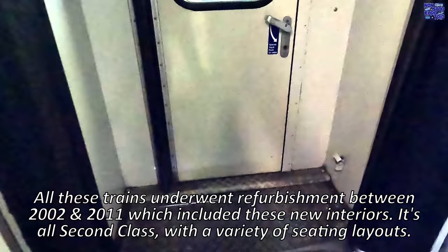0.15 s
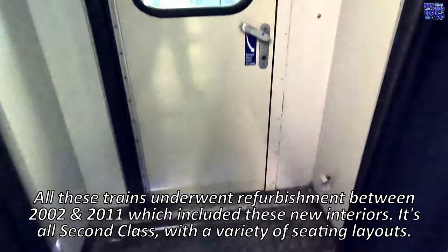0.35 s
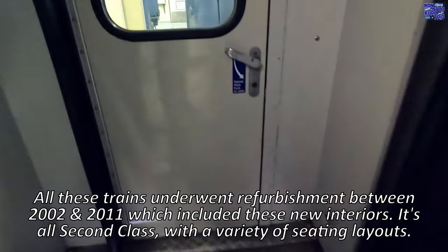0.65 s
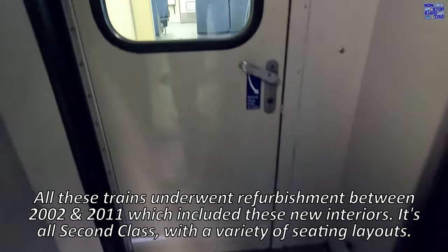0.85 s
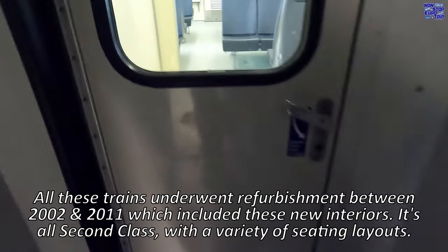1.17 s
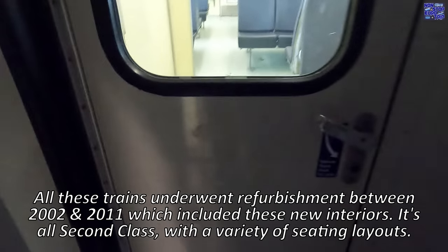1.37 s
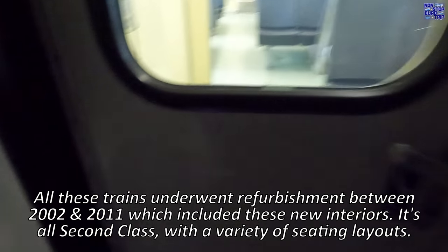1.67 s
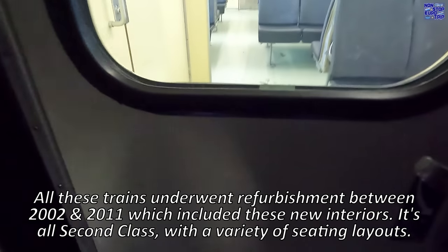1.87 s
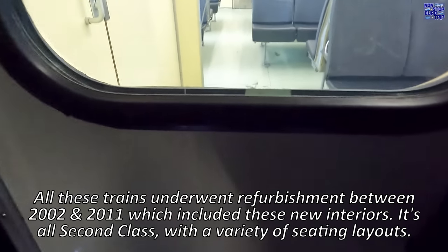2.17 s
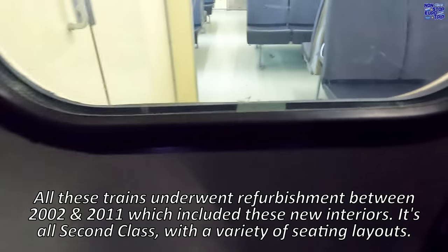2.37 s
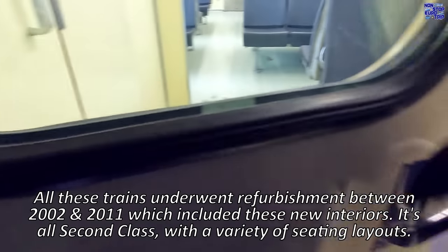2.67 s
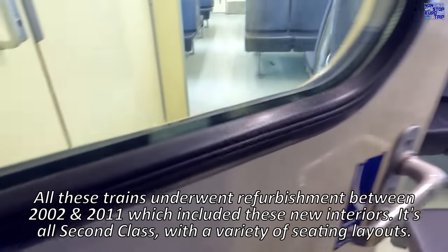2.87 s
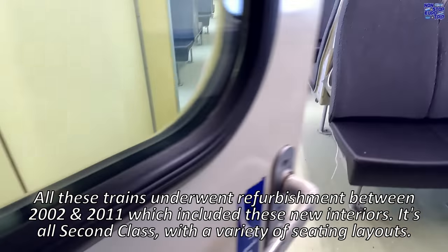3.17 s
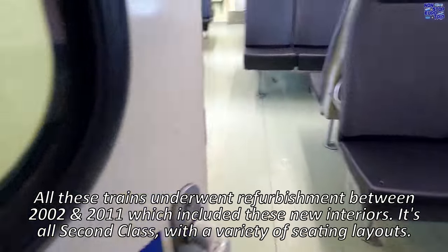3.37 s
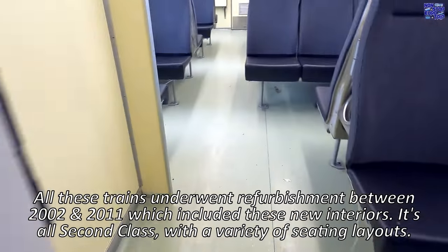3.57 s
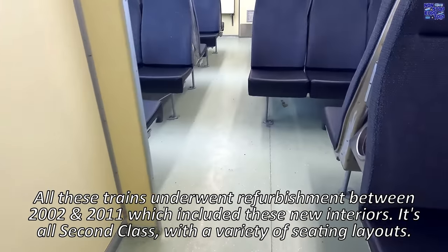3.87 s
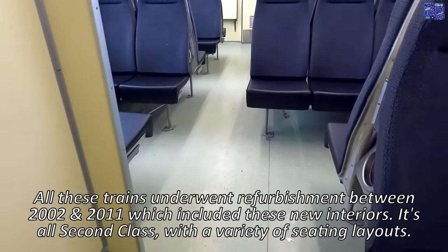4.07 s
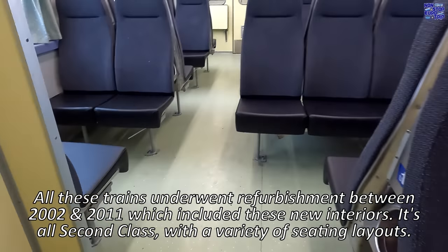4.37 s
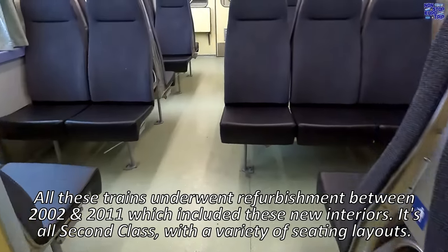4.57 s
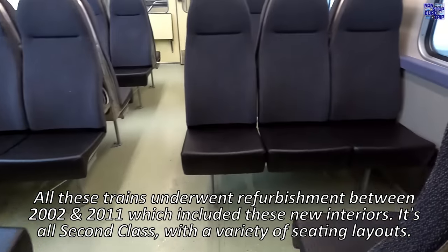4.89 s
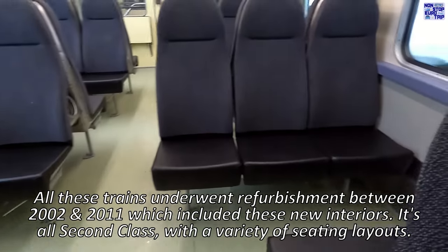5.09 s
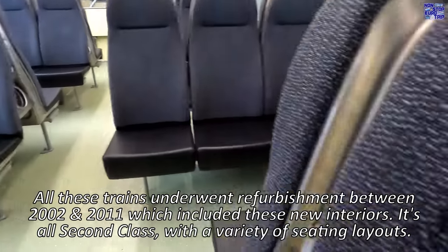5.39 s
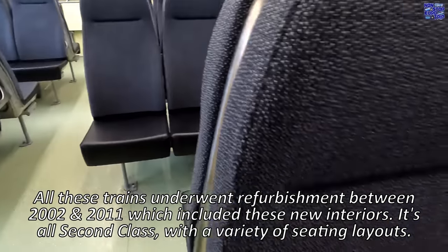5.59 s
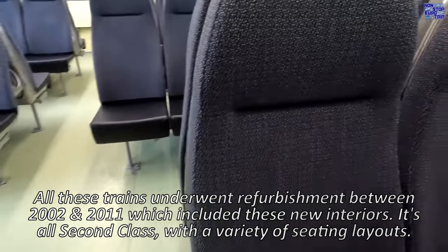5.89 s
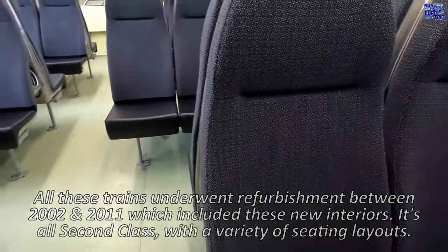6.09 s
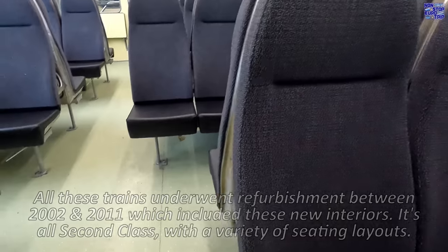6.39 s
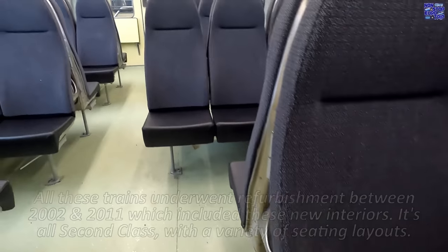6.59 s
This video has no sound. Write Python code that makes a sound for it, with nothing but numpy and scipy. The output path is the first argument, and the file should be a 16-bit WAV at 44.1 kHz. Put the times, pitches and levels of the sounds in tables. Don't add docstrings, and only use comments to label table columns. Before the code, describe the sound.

Soft steps and rubbing fabric lead to a sharp, heavy latch clatter with a brief high squeak. The steel door knocks loose, hinges creak faintly, the handle springs back and the panel bumps its stop. A quieter walk with scuffing shoes follows, then a solid slam shakes the carriage and loose metal jingles as the sound fades. Short hard echoes, low hum, close stereo microphone.

```python
import sys
import numpy as np
from scipy import signal
from scipy.fft import irfft
from scipy.io import wavfile
from scipy.ndimage import uniform_filter1d

SR = 44100
rng = np.random.default_rng(int(sys.argv[2]) if len(sys.argv) > 2 else 0)


def wav_record(signal):
    frames = np.transpose(np.atleast_2d(signal))
    bounded = np.clip(frames, -1, 1)
    quanta = np.round(bounded * 32767).astype(np.int16)
    wavfile.write(sys.argv[1], SR, quanta)


def gain_from_db(level_db):
    decades = np.asarray(level_db, float) / 20
    return 10 ** decades


N = 297057
TIME_S = np.arange(N) / SR

# freq_hz, level_db_per_hz
RUMBLE_SPECTRUM = [(7.1, -46), (12, 32.5), (34, 11), (50, 21.5), (64, -30), (83, 1), (110, 5.5), (140, -60)]
DRONE_SPECTRUM = [(35, -2.5), (60, 23), (75, -18.5), (129, 2), (183, -0.5), (268, -9), (465, -24),
                  (625, -21.5), (1500, -20), (1950, -104)]
HISS_SPECTRUM = [(290, -22), (500, -4), (1260, -50), (1930, -19), (3040, 7), (7330, -11), (10600, -40),
                 (12000, -10), (14400, -48)]
RUB_SPECTRUM = [(880, -58), (1500, -6.5), (4440, -4.5), (6340, -5.5), (7610, -6.5), (8220, -11),
                (10700, -16.5), (12000, -15), (14200, -27.5), (14900, -48)]
DRAG_SPECTRUM = [(180, -4), (300, -0.5), (517, -2), (726, -7.5), (883, -3.5), (1210, -2.5), (3500, -14.5),
                 (4550, -15), (7700, -120)]

# time_s, level_db
HUM_LEVEL = [(0, -44.5), (.3, -39.5), (.8, -46.5), (.95, -62), (2.2, -75), (2.6, -48.5), (3.1, -53),
             (3.6, -47), (4.2, -45), (4.6, -38.5), (4.8, -48), (4.95, -39.5), (5.72, -39), (5.85, -54),
             (6.06, -59), (6.25, -36.5), (6.74, -28)]
# start_s, hold_s, rumble_db, drone_rel_db
JOLTS = [(0, 0.5, -32.5, -7), (.62, 0.35, -35, -29), (1.14, 0.015, -27.5, -3.5), (1.35, 0.33, -31, -27),
         (1.89, 0.023, -48, 16), (2.25, 0.11, -31, -7.5), (2.9, 0.047, -45.5, 4.5), (3.58, 0.092, -26, -10),
         (4.24, 0.12, -32.5, -8), (4.5, 0.14, -43.5, -4.5), (5.3, 0.82, -38, -8), (6.0, 0.4, -36, -1),
         (6.41, 0.0043, -21.5, -21), (6.55, 0.23, -20.5, -16)]
# time_s, left_minus_right_db
CAMERA_TURN = [(.25, -.7), (.75, .5), (2.25, 1), (2.75, -1.2), (4.25, -1.5), (4.75, .8), (5.25, -1),
               (5.75, -.6), (6.25, .8)]
# start_s, hold_s, rub_db, drag_rel_db
MOVES = [(0, 0.14, -48.5, 0.5), (.25, 0.36, -54, 5), (.7, 0.32, -52, -2), (.98, 0.26, -47, 5),
         (1.26, 0.17, -53.5, 6.5), (1.5, 0.1, -42.5, -1.5), (1.81, 0.005, -35.5, 8),
         (2.83, 0.34, -57.5, 0.5), (3.4, 0.24, -53, 0), (4.33, 0.27, -46.5, 0), (4.66, 0.16, -43.5, 1),
         (4.95, 0.37, -52, 4.5), (5.42, 0.21, -48.5, 5), (5.75, 0.48, -57, 7), (6.28, 0.11, -51.5, 6),
         (6.66, .1, -53.5, 14.5)]
# time_s, left_minus_right_db
CLOTH_SIDE = [(0, -2.5), (.6, 0.5), (1.5, -1), (2.5, -3.5), (4.2, 8.5), (4.8, 5), (5.5, 0), (6.74, 3.5)]
# start_s, hold_s, low_mode_db, high_mode_rel_db
PANEL_HUMS = [(.1, 0.065, -45, -27), (1.12, 0.21, -44, -2), (2.95, 0.19, -60, -23),
              (4.05, 0.84, -62, 8.5), (6.4, 0.15, -44, 5.5)]
# freq_hz, width_hz, level_db
PANEL_HUM_MODES = [(181, 2, 0), (325, 47, 0)]
# start_s, swish_db, dull_rel_db, stroke_s, pitch_hz
SLEEVE_STROKES = [
    (.015, -42.5, 2, 0.032, 2530),
    (0.498, -50.5, -15, 0.037, 2780),
    (1.501, -46, -26, 0.057, 3960),
    (3.851, -52, 4.5, 0.02, 2980),
    (6.08, -52, -5, 0.043, 2400),
]
# start_s, peak_db, pitch_hz, t60_s
FLEXES = [(0.184, -22.5, 36, 0.12), (0.336, -23, 31.3, 0.12), (1.024, -21, 66.5, 0.28),
          (1.14, -23.5, 54, 0.71), (1.302, -25, 22.4, 0.69), (1.55, -28, 36, 1), (1.685, -11, 24, 0.17),
          (1.69, -22, 78.6, 0.31), (1.831, -22.5, 115.3, 0.24), (1.718, -14, 35.7, 0.33),
          (1.767, -8, 36, 0.2), (1.798, -14, 32.3, 0.41), (1.827, -4, 30.4, 0.084),
          (2.072, -13.5, 39.8, 0.092), (2.296, -24.5, 36.3, 0.45), (2.446, -18.5, 23.7, 0.18),
          (2.815, -21, 39.6, 0.12), (2.854, -21, 30.2, 0.11), (3.241, -21.5, 45.6, 0.071),
          (3.58, -29.5, 35, 0.78), (3.659, -21.5, 48, 0.12), (4.182, -97, 37.7, 0.37),
          (4.899, -24.5, 23.7, 0.15), (5.391, -27, 23.8, 0.19), (5.89, -19.5, 45, 0.2)]
# start_s, peak_db, pitch_hz, t60_s
SHUDDER = [
    (6.282, -14.5, 28.7, 0.58),
    (6.293, -9.5, 47.7, 0.36),
    (6.396, -10, 42.7, 0.23),
    (6.457, -8.5, 48.4, 0.35),
    (6.507, -19, 65, 0.57),
    (6.617, -13, 28.8, 0.68),
]
# start_s, level_db, contact_s, pitch_hz
KNOCKS = [(.236, -34, .006, 380), (1.681, -40, .012, 1400), (1.797, -33, .045, 5300),
          (1.803, -28, .01, 2900), (1.812, -22, .008, 690), (1.835, -22, .012, 318), (2.04, -24, .008, 640),
          (2.054, -24, .006, 700), (2.066, -30, .008, 2050), (2.222, -47, .01, 1150),
          (2.341, -29, .005, 640), (3.383, -42, .006, 1150), (3.3955, -32, .005, 350),
          (.235, -33, .005, 620), (5.145, -32, .004, 800), (5.15, -31, .004, 480), (5.153, -34, .005, 1250),
          (2.864, -36, .003, 4600), (2.876, -36, .002, 2300), (2.889, -38, .003, 4600),
          (2.901, -35, .003, 2200), (3.44, -48, .025, 1550), (3.572, -42, .012, 6100),
          (3.578, -38, .008, 1250), (5.816, -42, .006, 900), (6.697, -30, .008, 1100),
          (6.282, -21, .006, 1050), (6.286, -19, .007, 670), (6.297, -19, .007, 530),
          (6.308, -20, .006, 400), (6.318, -20, .007, 270), (6.319, -26, .008, 960), (6.325, -26, .01, 620)]
# start_s, thud_db, scuff_rel_db, pitch_hz
SOFT_STEPS = [(0.236, -25, -13, 131), (0.368, -37.5, -22, 300), (0.43, -36.5, -6, 236),
              (1.024, -27.5, -5.5, 105), (1.335, -47, 15, 110), (1.679, -23, -27, 114),
              (1.7, -23.5, -59, 191), (2.344, -35, -29, 136), (2.645, -43.5, -29, 130),
              (3.237, -52, -14, 165), (3.55, -33, -5, 127), (3.632, -35, -3.5, 149), (3.84, -41, -4, 118),
              (4.687, -34, 0.5, 119), (4.85, -35, -1.5, 170), (5.817, -29.5, -17, 126),
              (5.897, -32.5, -14, 119)]
# start_s, thud_db, scuff_rel_db, contact_s, pitch_hz
GRITTY_STEPS = [
    (0.947, -41, -13, 0.011, 154),
    (2.821, -30, -15, 0.0022, 171),
    (3.383, -55.5, 12, 0.013, 360),
    (4.785, -32.5, -4, 0.015, 292),
    (5.145, -24.5, -0.5, 0.0079, 106),
    (5.171, -38.5, 7.5, 0.015, 116),
    (6.033, -34, -10, 0.052, 118.6),
]

# start_s, clatter_db, panel_rel_db, tick_rel_db, rattle_s
HANDLE_BLOWS = [(1.147, -34.5, -5, 9, 0.012), (1.7152, -27.5, -32, 14, 0.0059),
                (1.728, -43, -24, 12, 0.0092), (1.7796, -25.5, 1, -3.5, 0.01),
                (1.794, -7.5, -6.5, -27.5, 0.0081), (1.806, -12, -21, -28, 0.00087),
                (1.814, -10.5, 7, -21, 0.0044), (1.8225, -16, 11, -10, 0.0022),
                (1.832, -11.5, 12.5, -14, 0.00089), (1.841, -21, 11, -21, 0.0028),
                (1.851, -21, -3, -22, 0.0066), (1.864, -18, 5, -19, 0.0039), (1.884, -37.5, 10, -7, 0.014)]
# time_s, pitch_hz, level_db
SQUEAK = [
    (1.864, 7770, -52),
    (1.878, 7768, -27),
    (1.905, 7765, -27),
    (1.95, 7760, -46),
    (1.975, 7765, -66),
]
# time_s, pitch_hz, level_db
CHIRP = [
    (2.005, 1746, -65.5),
    (2.011, 1670, -54),
    (2.03, 1700, -50),
]
# start_s, clatter_db, panel_rel_db, tick_rel_db, rattle_s
LEAF_BLOWS = [
    (2.029, -15, -0.5, -9.5, 0.0094),
    (2.038, -13, 8, 0.5, 0.0055),
    (2.046, -22, 2, -4, 0.0053),
    (2.059, -22.5, 16, 5, 0.0044),
    (2.0694, -25, -2, -4, 0.0054),
    (2.08, -33.5, -6, 5, 0.0084),
    (2.221, -30.5, -17.5, -16, 0.006),
    (2.2359, -37.5, 7, 3, 0.0082),
    (2.339, -23.5, -0.5, 1.5, 0.01),
    (2.3599, -40, -21, 5, 0.011),
]
# start_s, clatter_db, panel_rel_db, click_rel_db, rattle_s
BOLT_BLOWS = [
    (2.5194, -73.5, -4, 23, 0.012),
    (2.5755, -30, 1, 10.5, 0.0024),
    (2.6199, -51.5, 18, -10, 0.0058),
]
# time_s, pitch_hz, level_db
CREAK = [
    (2.485, 594, -62),
    (2.51, 662, -62),
    (2.555, 710, -77),
]
CREAK_AGAIN = [
    (2.615, 780, -60),
    (2.635, 853, -52),
    (2.66, 844, -88),
    (2.685, 920, -59),
    (2.71, 960, -80),
]
# start_s, clatter_db, panel_rel_db, tick_rel_db, rattle_s
SPRING_BLOWS = [
    (2.837, -32, -13, -9, 0.0095),
    (2.856, -37, -13, 13, 0.004),
    (2.8625, -26, -5, 4.5, 0.0036),
    (2.875, -16, -11, -12, 0.0036),
    (2.888, -35, 8, -2, 0.0033),
    (2.9, -22.5, 0, -25, 0.0025),
    (2.914, -35, -1, 0, 0.006),
]
# start_s, clatter_db, panel_rel_db, tick_rel_db, rattle_s
STOP_BLOWS = [
    (3.566, -22.5, -2, -20, 0.0055),
    (3.571, -19.5, 1.5, -0.5, 0.0059),
    (3.579, -43, 3, 7, 0.0025),
    (3.588, -28, 6, -17, 0.0081),
    (3.6, -32, -8, 2, 0.0082),
    (3.63, -55.5, -19, 12.5, 0.048),
]
# start_s, clatter_db, frame_rel_db, tick_rel_db, rattle_s
SLAM_BLOWS = [
    (6.276, -23, 14.5, 4, 0.008),
    (6.29, -15, 10, 3.5, 0.0045),
    (6.303, -13.5, 11, 9, 0.0019),
    (6.313, -17.5, 13.5, -8, 0.0018),
    (6.324, -31, 6, -7, 0.0032),
    (6.338, -31.5, -2, -5.5, 0.018),
    (6.394, -47, 11, 7.5, 0.08),
]
# start_s, clatter_db, frame_rel_db, tick_rel_db, rattle_s
JINGLE_BLOWS = [
    (6.494, -27, 19, 8, 0.0021),
    (6.513, -43.5, 6, 10.5, 0.011),
    (6.542, -40.5, 9.5, -1, 0.017),
    (6.586, -28.5, 10, -2, 0.0096),
    (6.696, -39, 11.5, 2, 0.019),
]

# freq_hz, level_db, t60_s
LATCH_MODES = [(1070, -22, 0.14), (1275, -10, 0.077), (1400, 1, 0.048), (1560, 0, 0.072), (1760, 8, 0.023),
               (1960, 8, 0.025), (2050, -13, 0.092)]
PANEL_MODES = [(130, -3, 0.069), (184, 8, 0.13), (320, -3, 0.29), (391, -6, 0.33), (416, -10, 0.56),
               (547, 3, 0.18), (690, -40, 0.27), (840, -23, 0.074), (869, -21, 0.12)]
LEAF_MODES = [(305, -3, 0.3), (322, -5, .5), (447, -8, 0.13), (511, -10, 0.1), (603, -12, .3),
              (640, 2, 0.07), (705, -1, 0.1), (760, -5, .06), (991, -3, .09), (1090, -6, .05)]
FRAME_MODES = [(196, 0.5, 0.2), (270, 3.5, 0.2), (376, 1, 0.44), (490, -7, 0.22), (550, -15, .12),
               (656, -18, 0.082), (738, -11, 0.18), (920, -3, .25), (1060, 1, 0.034), (1130, 0.5, 0.046),
               (1416, 5, 0.034), (1694, 8, 0.042)]
# freq_hz, width_hz, level_db
CLATTER_MODES = [(1020, 57, -14), (1470, 160, -1), (1890, 240, 20), (2100, 1500, 28), (2400, 80, -17)]

# freq_hz, t60_s
VESTIBULE_DECAY = [(100, 0.22), (500, 0.23), (2000, 0.2), (5000, 0.22), (12000, 0.13)]
# freq_hz, left_minus_right_db
PORT_LEAN = [(60, -1.4), (500, 2), (3000, 2.5), (6000, -0.5), (8500, 5.5), (10500, 3.5), (12000, 16),
             (13500, 11.5), (15000, -4)]
# freq_hz, correlation
PORT_LIKENESS = [(60, 0.99), (180, 1), (540, 0.82), (1610, 0.42), (4830, 0.37), (14500, 0.12)]

HISS_DB, HUM_HZ = -64, 100
STILL_RUMBLE_DB, STILL_DRONE_DB, JOLT_RISE_S, JOLT_FALL_S = -39, -47.5, 0.16, 0.14
REST_RUB_DB, REST_DRAG_DB, MOVE_RISE_S, MOVE_FALL_S = -62, -57.5, 0.22, 0.19
SLEEVE_BRIGHT_REL_DB = -6
SOFT_CONTACT_S = 0.014
SOFT_GRIT_REL_DB, GRIT_OVER_SCUFF_DB = -101, 1
HANDLE_HZ, LEAF_HZ, BOLT_HZ, STOP_HZ, SLAM_HZ = 4680, 4440, 8500, 4030, 3500
SPRING_HZ, JINGLE_HZ = 4600, 3400
PUSH_SHARE = 0.3
ECHO_TURN_S = 0.5
FADE_START_S, FADE_DB_PER_S = 6.36, -42


def evened(x):
    return x / np.sqrt(np.mean(x ** 2) + 1e-20)


def read(points, hz):
    f, value = np.transpose(points)
    return np.interp(np.log(hz + 1), np.log(f + 1), value)


def curves(rows):
    s, *columns = np.transpose(rows)
    return [np.interp(TIME_S, s, column) for column in columns]


def panned(db):
    return gain_from_db(np.array([db / 2, -db / 2]))


def wander(seconds):
    size = int(seconds * SR)
    smooth = uniform_filter1d(rng.standard_normal(N), size)
    return evened(uniform_filter1d(smooth, size))


def likeness(hz):
    return np.clip(read(PORT_LIKENESS, hz), -1, 1)[:, None]


def noise(spectrum, patchy_db, size):
    frames, hz = 4 * N // size + 5, np.fft.rfftfreq(size, 1 / SR)
    a, b, c, d, patches = rng.standard_normal((frames, len(hz), 5)).T
    patches = uniform_filter1d(patches, 8, 0)
    patches = evened(uniform_filter1d(patches, 10, 1))
    same, left, other = likeness(hz), a + 1j * b, c + 1j * d
    z = np.array([left, same * left + np.sqrt(1 - same ** 2) * other])
    z *= gain_from_db(read(spectrum, hz)[:, None] + patchy_db * patches)
    return evened(signal.istft(z, nperseg=size, noverlap=3 * size // 4)[1][:, :N])


def swells(rows, rests_db, rise_s, fall_s):
    s, hold, db, second_rel_db = np.transpose(rows)[:, :, None]
    t = np.arange(0, N / SR + .002, .002)
    rising, falling = 1 + (t - s) / rise_s, 1 + (s + hold - t) / fall_s
    ramp = np.clip(np.minimum(rising, falling), 0, 1) ** 2
    gains = []
    for rest_db, top_db in zip(rests_db, [db, db + second_rel_db]):
        power = gain_from_db(rest_db) ** 2 + np.sum((gain_from_db(top_db) * ramp) ** 2, axis=0)
        gains.append(np.interp(TIME_S, t, np.sqrt(power)))
    return gains


def body(peaks, lo_hz, hi_hz, broad_db, order=2):
    t = np.arange(8192) / SR
    band = signal.butter(order, [lo_hz, hi_hz], "band", fs=SR, output="sos")
    rings = 0
    for hz, width_hz, db in peaks:
        decay = np.exp(-np.pi * width_hz * t)
        rings = rings + gain_from_db(db) * np.sqrt(width_hz) * decay * np.sin(2 * np.pi * hz * t)
    thump = evened(signal.sosfilt(band, 1. * (t == 0)))
    h = evened(signal.sosfilt(band, rings)) + gain_from_db(broad_db) * thump
    return h / np.linalg.norm(h)


def ringing(modes, damping):
    return [(hz, damping * np.log(1000) / np.pi / t60, db) for hz, db, t60 in modes]


def pitched(rows, hz):
    return [(*row, hz) for row in rows]


def strikes(rows, bodies, rises_s, grain_db, solid):
    t, out = np.arange(12000) / SR, np.zeros(N + 24000)
    shapes = {hz: bodies(hz) for hz in {row[-1] for row in rows}}
    for s, db, second_rel_db, third_rel_db, last_s, hz in rows:
        levels_db = [db, db + second_rel_db, db + third_rel_db]
        decay_s = max(last_s, .001)
        contacts = rng.standard_normal(len(t))
        grains = np.repeat(rng.standard_normal(len(t) // 40), 40)
        contacts = evened(contacts * gain_from_db(grain_db * grains))
        for h, rise_s, firm, level_db in zip(shapes[hz], rises_s, solid, levels_db):
            force = contacts * (1 - np.exp(-t / rise_s)) * np.exp(-t / decay_s)
            push = np.hanning(int(PUSH_SHARE * min(rise_s, .004) * SR) + 3)
            force[:len(push)] += firm * np.sqrt(decay_s * SR) * push / push.sum()
            force = force[:int(9 * max(last_s, rise_s) * SR) + 99]
            sound = signal.fftconvolve(gain_from_db(level_db) * force, h)
            out[round(s * SR):][:len(sound)] += sound
    return out[:N]


def car():
    (hum_db,) = curves(HUM_LEVEL)
    rock, fans = swells(JOLTS, [STILL_RUMBLE_DB, STILL_DRONE_DB], JOLT_RISE_S, JOLT_FALL_S)
    turns = np.cumsum(HUM_HZ + 1.13 * wander(0.09)) / SR
    hum = np.sqrt(2) * gain_from_db(hum_db + 1.0 * wander(0.0039)) * np.sin(2 * np.pi * turns)
    rumble = rock * noise(RUMBLE_SPECTRUM, 0.51, size=4096)
    drone = fans * noise(DRONE_SPECTRUM, 4.2, size=2048)
    hiss = gain_from_db(HISS_DB - 2.5) * noise(HISS_SPECTRUM, 2.0, size=512)
    return rumble + hum + drone + hiss


def clothes():
    (side_db,) = curves(CLOTH_SIDE)
    bright, dull = swells(MOVES, [REST_RUB_DB, REST_DRAG_DB], MOVE_RISE_S, MOVE_FALL_S)
    rub = bright * noise(RUB_SPECTRUM, 0.63, size=256)
    drag = dull * noise(DRAG_SPECTRUM, 2.17, size=512)
    return gain_from_db(0.75 * wander(0.014)) * panned(side_db) * (rub + drag)


def panel_hum():
    out = np.zeros(N)
    for gain, mode in zip(swells(PANEL_HUMS, [-70, -68], 0.086, 0.15), PANEL_HUM_MODES):
        sheet = body([mode], 94, 420, broad_db=-49)
        out += gain * signal.oaconvolve(rng.standard_normal(N), sheet)[:N]
    return out


def sleeve():
    dull = body([(1000, 1200, 0)], 820, 2800, broad_db=10)
    bright = body([(5800, 4100, 0)], 2960, 9600, broad_db=-2.0)

    def bodies(hz):
        swish = body([(hz, hz / 3, 0)], 1430, 4800, broad_db=11.0)
        return [swish, dull, bright]

    rows = [(s, db, dull_db, SLEEVE_BRIGHT_REL_DB, last, hz) for s, db, dull_db, last, hz in SLEEVE_STROKES]
    return gain_from_db(19.0) * strikes(rows, bodies, [.1, .1, .1], grain_db=-0.5, solid=[0, 0, 0])


def booms():
    t, out = np.arange(SR // 2) / SR, np.zeros(N + SR)
    onset = 1 - np.exp(-t / 0.0055)
    for s, db, hz, t60 in list(FLEXES) + list(SHUDDER):
        swing = np.sin(2 * np.pi * hz * t) * onset
        out[round(s * SR):][:len(t)] += gain_from_db(db + 6.5 - 60 * t / t60) * swing
    return out[:N]


def raps():
    def bodies(hz):
        return [body([(hz, hz / 9, 0)], .6 * hz, 1.6 * hz, broad_db=-4)]

    rows = [(s, db, 0, 0, last, hz) for s, db, last, hz in KNOCKS]
    return strikes(rows, bodies, [.002], grain_db=1.5, solid=[.9])


def steps():
    scuff = body(CLATTER_MODES, 1060, 2000, broad_db=34.0)
    grit = body([(4200, 4500, 0)], 1120, 6600, broad_db=9)

    def bodies(hz):
        thud = body([(hz, hz / 4, 0), (1.69 * hz, hz / 3, -4)], 70, 306, broad_db=-2.5)
        return [thud, scuff, grit]

    rows = [(s, db, scuff_db, SOFT_GRIT_REL_DB, SOFT_CONTACT_S, hz) for s, db, scuff_db, hz in SOFT_STEPS]
    rows += [(s, db, scuff_db, scuff_db + GRIT_OVER_SCUFF_DB, last, hz)
             for s, db, scuff_db, last, hz in GRITTY_STEPS]
    return gain_from_db(-4.0) * strikes(rows, bodies, [.01, .003, .008], grain_db=3.0, solid=[2.2, .1, .02])


def panel():
    return body(ringing(PANEL_MODES, 0.73), 157, 790, broad_db=2)


def loose_metal():
    return body(CLATTER_MODES, 900, 2400, broad_db=-2)


def handle():
    latch, shut = body(ringing(LATCH_MODES, 2.5), 1150, 3600, broad_db=5), panel()

    def bodies(hz):
        return [latch, shut, body([(hz, hz / 8, 0)], 1760, 5560, broad_db=56.0)]

    rows = pitched(HANDLE_BLOWS, HANDLE_HZ)
    return strikes(rows, bodies, [.0015, .003, .0004], grain_db=3, solid=[.15, .4, .08])


def whistle(rows, flutter_db, waver=.005):
    hz, db = curves(rows)
    hz = hz * (1 + waver * wander(0.0066))
    gate = np.clip(np.minimum(TIME_S - rows[0][0], rows[-1][0] - TIME_S) / 0.0022, 0, 1)
    level = np.sqrt(2) * gate * gain_from_db(db + flutter_db * wander(0.0064))
    return level * np.sin(2 * np.pi * np.cumsum(hz) / SR)


def latch_spring():
    return whistle(SQUEAK, 2.8, waver=.0015) + whistle(CHIRP, 2.9)


def leaf():
    clatter, free = loose_metal(), body(ringing(LEAF_MODES, 1.4), 220, 1150, broad_db=-5)

    def swing_bodies(hz):
        peaks = [(hz, hz / 6, 0), (1.55 * hz, hz / 4, 0)]
        return [clatter, free, body(peaks, 0.75 * hz, 2 * hz, broad_db=3)]

    def bolt_bodies(hz):
        return [clatter, free, body([(hz, hz / 7, 0)], 0.5 * hz, 1.64 * hz, broad_db=-1.0)]

    swing = strikes(pitched(LEAF_BLOWS, LEAF_HZ), swing_bodies, [.003, .004, .002],
                    grain_db=2.5, solid=[.07, .7, .05])
    bolt = strikes(pitched(BOLT_BLOWS, BOLT_HZ), bolt_bodies, [.003, .004, .0008],
                   grain_db=2.5, solid=[.07, .9, .1])
    return gain_from_db(-4.5) * (swing + bolt)


def hinge():
    return whistle(CREAK, 1.6) + whistle(CREAK_AGAIN, 3.5)


def stop():
    catch = body([(1700, 300, -5), (2250, 400, 0), (2750, 400, -2)], 1200, 3500, broad_db=3)
    shut = panel()

    def bodies(hz):
        rattle = body([(hz, hz / 12, 0)], 1700, hz + 900, broad_db=2.0 + 9 * (hz < 4300), order=4)
        return [catch, shut, rattle]

    rows = pitched(SPRING_BLOWS, SPRING_HZ) + pitched(STOP_BLOWS, STOP_HZ)
    return gain_from_db(-4.5) * strikes(rows, bodies, [.0015, .004, .001], grain_db=2.0, solid=[.3, .3, .25])


def slam():
    clatter = loose_metal()
    frame = body(ringing(FRAME_MODES, 1.3), 120, 1900, broad_db=3, order=3)

    def slam_bodies(hz):
        return [clatter, frame, body([(hz, hz / 8, 0)], 2030, 5400, broad_db=12.0)]

    def jingle_bodies(hz):
        return [clatter, frame, body([(hz, hz / 11, 0)], 2200, 5600, broad_db=1, order=3)]

    shut = strikes(pitched(SLAM_BLOWS, SLAM_HZ), slam_bodies, [.005, .005, .004],
                   grain_db=2.0, solid=[.03, .1, .02])
    jingle = strikes(pitched(JINGLE_BLOWS, JINGLE_HZ), jingle_bodies, [.003, .004, .002],
                     grain_db=1, solid=[.05, .15, .03])
    return gain_from_db(-0.5) * (shut + jingle)


def echoes():
    taps = np.zeros((3, 2, SR // 2))
    at = np.arange(200, SR // 2 - 20, 20)
    at = at + rng.integers(0, 20, (2, len(at)))
    signs = rng.choice([-1., 1.], at.shape)
    for k, pattern in enumerate(taps):
        np.put_along_axis(pattern, at, np.roll(signs, 300 * k, axis=1), 1)
    hz, t, z = signal.stft(taps, SR, nperseg=256)
    same = likeness(hz)
    z[:, 1] = same * z[:, 0] + np.sqrt(1 - same ** 2) * z[:, 1]
    decay = gain_from_db(-60 * t / read(VESTIBULE_DECAY, hz)[:, None])
    tails = signal.istft(z * decay, SR, nperseg=256)[1]
    return tails / np.linalg.norm(tails[0, 0])


def vestibule(x, tails):
    turn = np.pi * TIME_S / ECHO_TURN_S
    out = np.zeros((2, N))
    for k, tail in enumerate(tails):
        share = np.sqrt(2 / 3) * np.cos(turn + k * np.pi / 3)
        out += signal.oaconvolve((x * share)[None], tail, axes=1)[:, :N]
    return out


def scene():
    knocks = handle() + leaf() + stop() + slam()
    knocks += steps() + sleeve()
    knocks += latch_spring() + hinge()
    tails = echoes()
    around = panned(*curves(CAMERA_TURN)) * (booms() + car() + panel_hum()) + clothes()
    knocks += raps()
    return knocks + gain_from_db(-1.5) * vestibule(knocks, tails) + around


def low_pass(x):
    return signal.sosfilt(signal.butter(12, 15060, fs=SR, output="sos"), x)


def record(dry):
    hz = np.fft.rfftfreq(1024, 1 / SR)
    top = 1 / np.sqrt(1 + (hz / 13500) ** 24)
    ports = irfft(panned(read(PORT_LEAN, hz)) * top)
    ports = np.roll(ports, 512, axis=1) * np.hanning(1024)
    heard = signal.oaconvolve(dry, ports, axes=1)[:, 512:N + 512]
    heard = heard * gain_from_db(FADE_DB_PER_S * np.maximum(TIME_S - FADE_START_S, 0))
    limited = np.tanh(heard / 1.601) * 1.447
    return low_pass(limited)


dry = scene()
out = record(dry)
wav_record(out)
```